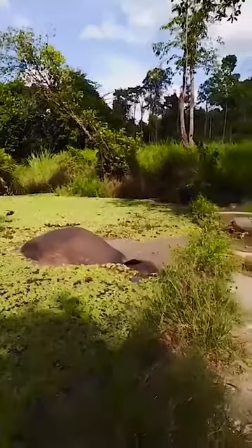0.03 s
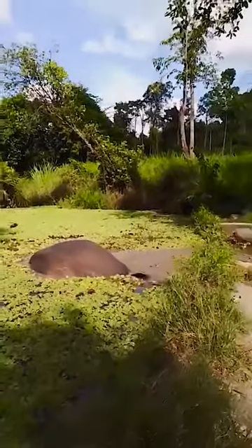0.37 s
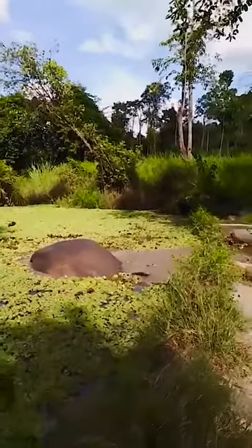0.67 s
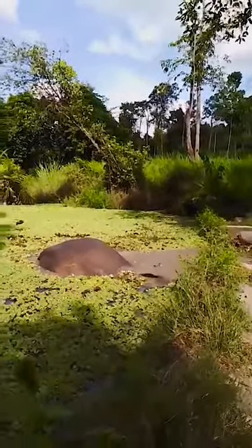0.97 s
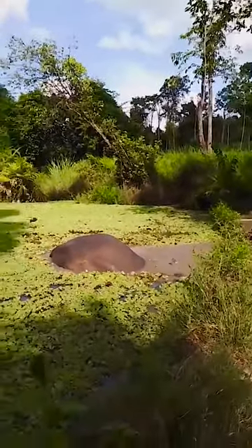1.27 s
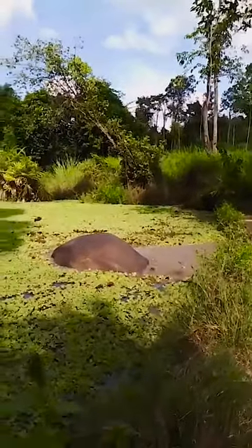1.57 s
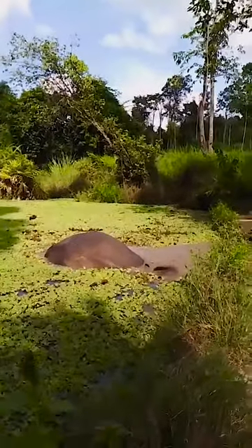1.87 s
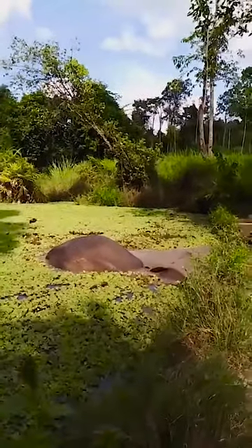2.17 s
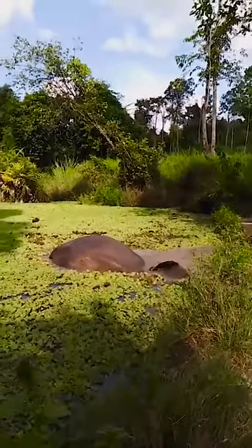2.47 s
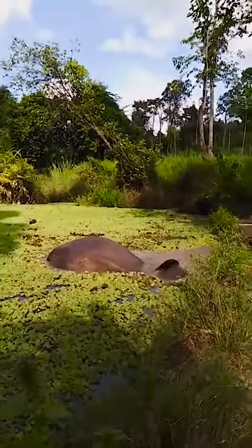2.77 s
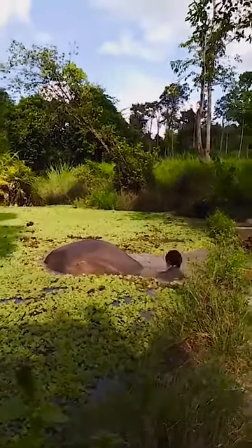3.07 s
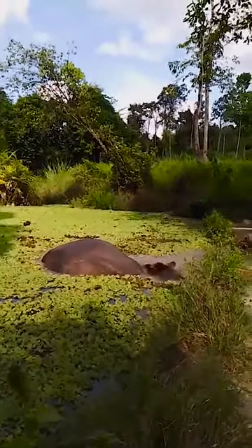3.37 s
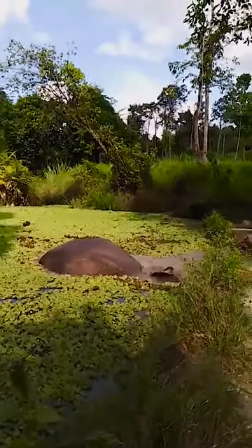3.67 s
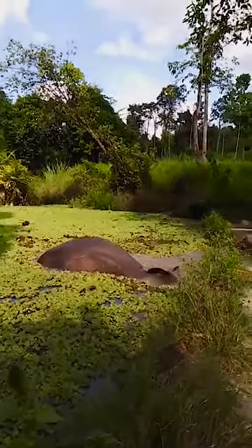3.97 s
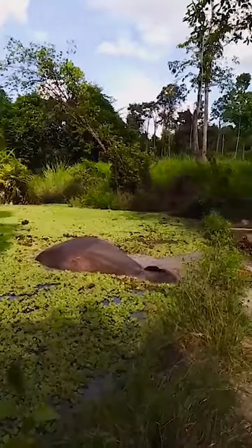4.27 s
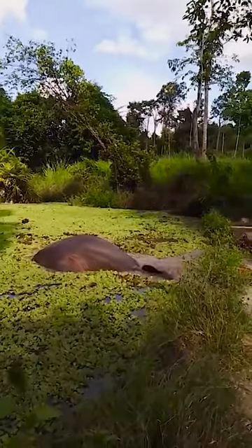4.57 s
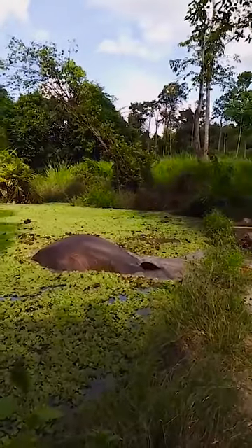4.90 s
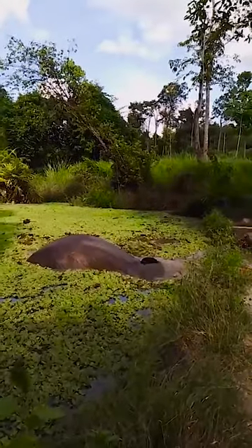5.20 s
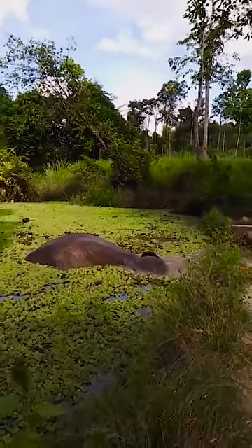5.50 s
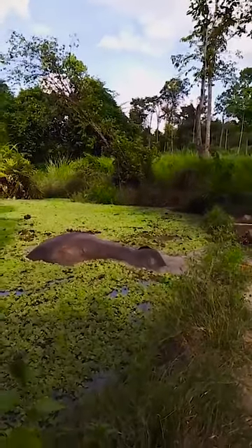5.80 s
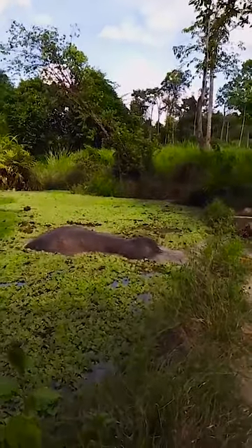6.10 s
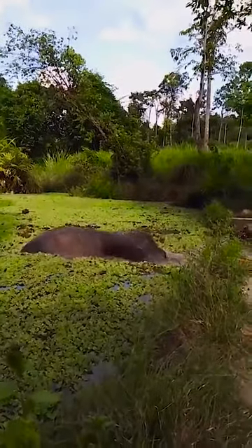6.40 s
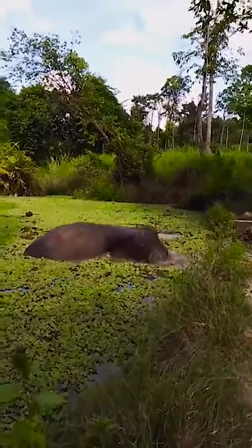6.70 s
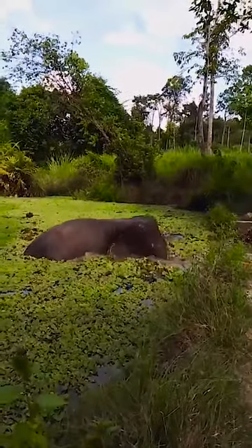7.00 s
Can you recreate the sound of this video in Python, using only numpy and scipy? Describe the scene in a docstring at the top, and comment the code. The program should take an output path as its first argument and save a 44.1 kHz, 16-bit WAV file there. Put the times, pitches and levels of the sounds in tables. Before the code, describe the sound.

Dull wind knocks and rumble die down over faint tree hiss, followed by a soft, distant slosh and splash.

```python
"""First you hear wind thumping on a phone's microphone: short dull knocks over a low rumble, and one pop.
Swirls of air (eddies) make the knocks as they hit it, and the air flowing past makes the rumble.
The gusts pass and the breeze drops, while distant trees hiss faintly all the way through.
Near the end a large animal stirs a weedy pond some way off: a slosh, then a small splash
in which trapped pockets of air ring."""
import sys
import numpy as np
from scipy import signal
from scipy.fft import rfft, irfft
from scipy.io import wavfile
from scipy.ndimage import uniform_filter1d

SR = 44100
rng = np.random.default_rng(int(sys.argv[2]) if len(sys.argv) > 2 else 0)


def store_pcm(level_fs):
    """Save levels as 16-bit WAV."""
    pcm = np.round(np.clip(level_fs, -1, 1) * 32767).astype(np.int16)
    wavfile.write(sys.argv[1], SR, np.atleast_2d(pcm).T)


N = 310905
TIME = np.arange(N) / SR


# Big eddies hitting the microphone. Each is a low thump plus a snap that fades above its edge:
# (time [s], thump level [dB], thump pitch [Hz], snap level [dB], snap edge [Hz])
BIG_EDDY_HITS = [(.053, -37.5, 157, -39, 290), (0.084, -32.5, 170, -35.5, 268),
                 (0.151, -25.5, 156, -39, 270), (0.23, -32.5, 147, -36, 278),
                 (0.359, -26.5, 147, -42.5, 270), (.5418, -29.5, 161, -31.5, 546),
                 (0.5877, -33.5, 155, -36.5, 517), (0.615, -27, 155, -32.5, 550),
                 (0.6224, -28.5, 169, -32, 500), (0.6889, -19.5, 157, -32.5, 250),
                 (0.8004, -27.5, 149, -41, 270), (0.8373, -27, 150, -42, 288), (0.8633, -27, 153, -38, 270),
                 (0.878, -36, 153, -18, 394), (.8896, -15.5, 240, -11, 293), (.94, -14, 135.5, -24.5, 526),
                 (1.1098, -27.5, 149, -39, 266), (1.1268, -28, 141, -34.5, 290),
                 (1.1993, -25.5, 157, -30, 265), (1.431, -20.5, 213, -29.5, 318),
                 (1.47, -26, 140, -52, 270), (1.5758, -27.5, 129, -45.5, 271),
                 (1.935, -39, 188, -62.5, 250), (2.119, -27, 164, -36.5, 230),
                 (2.714, -46.5, 158, -41.5, 270), (2.7698, -31, 139, -43.5, 272),
                 (2.8862, -30.5, 140, -38.5, 267), (2.957, -32, 206, -38.5, 220),
                 (2.9842, -18, 146.5, -33.5, 330), (3.04, -17, 145, -36.5, 330),
                 (4.261, -48.5, 170, -46.5, 300), (4.275, -17, 142, -26, 232), (4.4492, -32, 139, -38, 318),
                 (4.9262, -43.5, 202, -43.5, 269), (5.502, -31, 223, -40.5, 200)]

def big_eddies(gust, shove_hz=48, shove_width_s=0.0086, shove_lag_s=0.0074):
    """Each big eddy gives a dull thump and, just after it, a slow shove of bass."""
    out = np.zeros(N)
    phases = rng.uniform(0, 2 * np.pi, (len(BIG_EDDY_HITS), 2))
    for (s, db, hz, snap_db, edge_hz), (skew, phase) in zip(BIG_EDDY_HITS, phases):
        thump = eddy(hz, undb(snap_db - db), edge_hz, skew)
        t = (np.arange(len(thump)) - len(thump) // 2) / SR
        shove = bell(t - shove_lag_s, shove_width_s) * np.cos(2 * np.pi * shove_hz * t + phase)
        shove_db = -15.5 + 0.61 * db + 4.5 * np.interp(s, TIME, gust)  # heavier with thump and gust
        add(out, s + t[0], undb(db) * thump + undb(shove_db) * shove)
    return out


def eddy(thump_hz, snap_gain, edge_hz, skew, low_cut_hz=370, scuff_s=0.0036, lag_s=0.0021, size=4096):
    """One swirl of air: a sharp, ragged snap and, a moment later, a round swing of pressure."""
    f = np.maximum(np.fft.rfftfreq(size, 1 / SR), 1)
    t = np.fft.fftfreq(size, SR / size)
    swing = bell(np.log2(f / thump_hz), 0.43)  # width in octaves
    late_swing = swing / irfft(swing)[0] * np.exp(-2j * np.pi * f * lag_s)
    snap = np.exp(-f / edge_hz) * f ** 4 / (f ** 4 + low_cut_hz ** 4)
    # finer whirls travel with the eddy and roughen the snap
    whirls = rng.standard_normal(size) * bell(t, scuff_s)
    ragged = 1 + 0.52 * rfft(whirls) / np.linalg.norm(whirls)
    spectrum = late_swing + snap_gain * ragged * snap / irfft(snap)[0]
    # skew turns a push into a push-and-pull or a suck
    pulse = irfft(spectrum * np.exp(1j * skew))
    return np.roll(pulse, size // 2)


# Gusts of wind: (time [s], time held [s], strength [dB])
WIND_GUSTS = [(0.118, 0.13, -1.5), (0.329, 0.053, -2), (0.494, 0.26, -2), (0.879, 0.063, 2.5),
              (1.01, 0.22, -3.5), (1.44, 0.038, 4.5), (1.549, 0.051, -1.5), (2.976, 0.026, 0.5)]

def gusts(rise_s=0.036, fall_s=0.05):
    """How hard the air is gusting at each moment; the eddies and the rumble follow it."""
    return np.max([undb(db) * swell(s, hold_s, rise_s, fall_s) for s, hold_s, db in WIND_GUSTS], axis=0)


# The tone of the wind's deep rumble and of its lighter flutter: (frequency [Hz], level [dB])
RUMBLE_TONE = [(8, -9.5), (18, -1.5), (36, 0), (55, -8), (72, -14), (90, -28.5), (130, -48.5)]
FLUTTER_TONE = [(70, -31.5), (95, -7.5), (120, 3), (150, -1), (185, -10.5), (240, -24), (420, -44)]

def wind(gust, breeze_db=-42.5, drop_db_per_s=0.96, gust_db=-35):
    """Air flowing over the microphone: a rumble that swells in gusts, a flutter that follows the breeze."""
    breeze = undb(breeze_db - drop_db_per_s * TIME)
    rumble = colour(rng.standard_normal(N), RUMBLE_TONE) * np.hypot(breeze, undb(gust_db) * gust)
    flutter = colour(rng.standard_normal(N), FLUTTER_TONE) * breeze
    flicker = undb(-12.5 + 1.5 * wander(25))
    waver = undb(1.74 * wander(8.8))
    return rumble * waver + flutter * flicker


def small_eddies(gust, count=520, thump_hz=145, scatter_db=5.5, calm_db=-64, gust_db=-37.5):
    """Small eddies crowd in at random, faint in calm air and strong in a gust."""
    out = np.zeros(N)
    for (place, turn), (pitch, force) in zip(rng.random((count, 2)), rng.standard_normal((count, 2))):
        pulse = eddy(thump_hz * np.exp(0.31 * pitch), undb(-17), edge_hz=230, skew=2 * np.pi * turn)
        start_s = (place * N - len(pulse) / 2) / SR
        add(out, start_s, undb(scatter_db * np.tanh(force)) * pulse)
    return out * np.hypot(undb(calm_db), undb(gust_db) * gust)


def pop(at_s=0.6286, level_db=-24, build_s=0.0026, release_s=0.00001):
    """One sharp pop: pressure builds on the microphone and lets go almost at once."""
    t = TIME - at_s
    return undb(level_db) * np.exp(np.minimum(t / build_s, -t / release_s))


# The tone of sloshing water: (frequency [Hz], level [dB])
SLOSH_TONE = [(200, -20), (450, 3), (620, -4.5), (900, 1), (1300, -1.5), (1700, -16), (2400, -15.5),
              (3200, -34.5), (8000, -49)]
# Water pushed about by the animal: (peak time [s], level [dB], rise [s], fall [s])
WATER_PUSHES = [(5.68, -65.5, 0.092, .11), (6.34, -59.5, 0.08, 0.14), (6.36, -56, .014, 0.039)]
# Air pockets in the splash: (time [s], starting pitch [Hz], level [dB], ring length [cycles])
AIR_POCKETS = [(6.288, 2350, -57.5, 85), (6.293, 1150, -54.5, 11), (6.351, 880, -39.5, 6.2),
               (6.359, 445, -37.5, 10.5), (6.359, 240, -48, 6.2), (6.362, 790, -44, 8.4),
               (6.364, 1240, -59, 12), (6.392, 2400, -55, 16), (6.394, 880, -47.5, 8.7)]

def water(grain_db=4, pitch_rise=0.077, onset_cycles=0.65):
    """Grainy sloshing, and air pockets that ring and rise in pitch as the surface slaps shut."""
    slosh = colour(rng.standard_normal(N) * undb(grain_db * wander(160)), SLOSH_TONE)
    pushes = [undb(db) * swell(s, 0, rise_s, fall_s) for s, db, rise_s, fall_s in WATER_PUSHES]
    out = slosh * np.max(pushes, axis=0)
    for s, hz, db, ring_cycles in AIR_POCKETS:
        cycles = np.arange(int(2 * ring_cycles * SR / hz)) * hz / SR
        ring = (1 - np.exp(-cycles / onset_cycles)) * undb(-40 * cycles / ring_cycles)
        tone = np.sin(2 * np.pi * cycles * (1 + pitch_rise * cycles / ring_cycles / 2))
        add(out, s, undb(db) * ring / ring.max() * tone)
    return out


# The tone of the background hiss: (frequency [Hz], level [dB])
HISS_TONE = [(120, -7.5), (250, 2.5), (500, 0.5), (1000, 0), (1500, -2.5), (2200, -7.5), (3000, -17),
             (4000, -29.5), (6000, -34.5), (9500, -34), (11000, -51.5), (15000, -38.5)]

def distant_trees(level_db=-67.5):
    """The smooth, dull hiss of distant trees, almost steady."""
    return colour(rng.standard_normal(N), HISS_TONE) * undb(level_db - 0.06 * wander(1.7))


def undb(db):
    """Turn decibels into a number to multiply a sound by."""
    return 10 ** (np.asarray(db) / 20)


def bell(x, width):
    """A smooth hump, 1 high where x is 0."""
    return np.exp(-0.5 * (x / width) ** 2)


def swell(s, hold_s, rise_s, fall_s):
    """A loudness curve that rises to 1 at s seconds, holds and dies away."""
    return np.exp(np.minimum(0, np.minimum((TIME - s) / rise_s, (s + hold_s - TIME) / fall_s)))


def wander(per_second):
    """A smooth random curve that mostly stays between -1 and 1."""
    hold = int(SR / per_second)
    steps = np.repeat(rng.standard_normal(N // hold + 1), hold)
    smooth = uniform_filter1d(uniform_filter1d(steps, hold), hold)[:N]
    return smooth / smooth.std()


def colour(noise, tone):
    """Shape noise with a tone table, then set its average strength (rms) to 1."""
    hz, db = np.transpose(tone)
    f = np.maximum(np.fft.rfftfreq(N, 1 / SR), 1)
    gain = undb(np.interp(np.log(f), np.log(hz), db))
    gain /= 1 + (f / (2 * hz[-1])) ** 4  # fade out above the table's last row
    shaped = irfft(rfft(noise) * gain, N)
    return shaped / shaped.std()


def add(out, s, sound):
    """Mix a sound in, starting at s seconds."""
    i = int(round(s * SR))
    a, b = max(i, 0), min(i + len(sound), N)
    if b > a:
        out[a:b] += sound[a - i:b - i]


def scene():
    """Wind at the microphone over the quiet pond, in one channel."""
    gust = gusts()
    return (big_eddies(gust) + small_eddies(gust) + wind(gust) + distant_trees() + water() + pop())[None]


def record(dry, top_hz=14000):
    """The phone cuts off the highest treble."""
    return signal.sosfilt(signal.ellip(8, 0.2, 70, top_hz, fs=SR, output="sos"), dry)


dry = scene()
out = record(dry)
store_pcm(out)
```